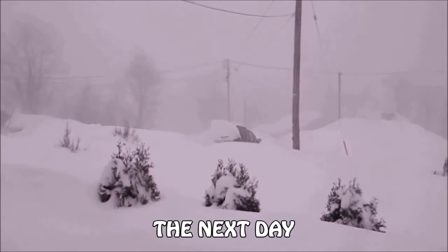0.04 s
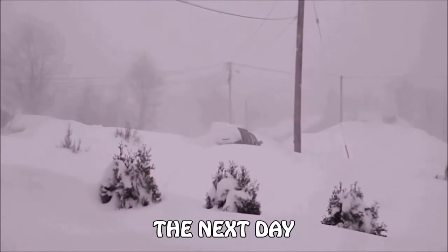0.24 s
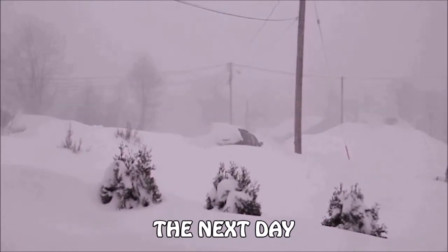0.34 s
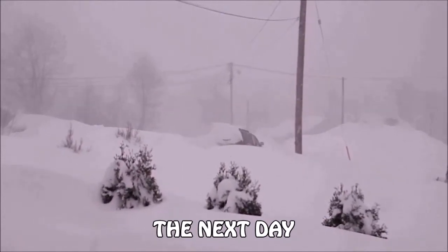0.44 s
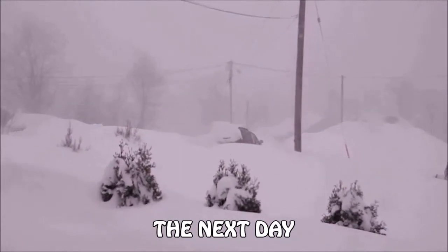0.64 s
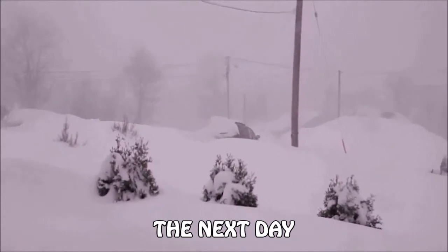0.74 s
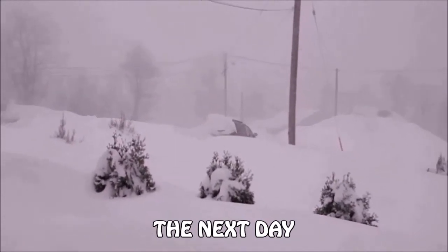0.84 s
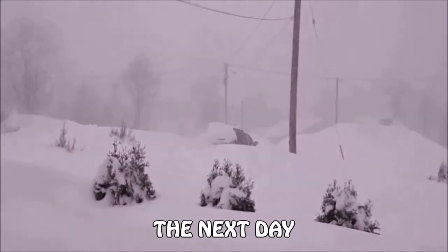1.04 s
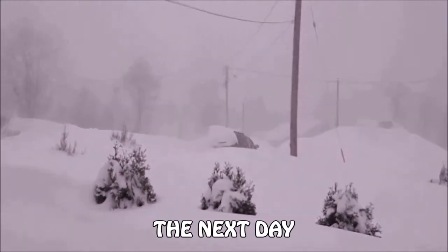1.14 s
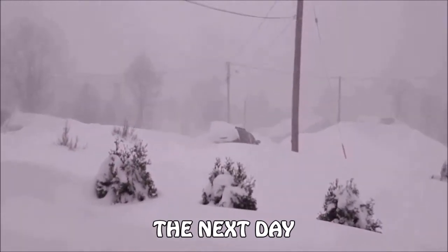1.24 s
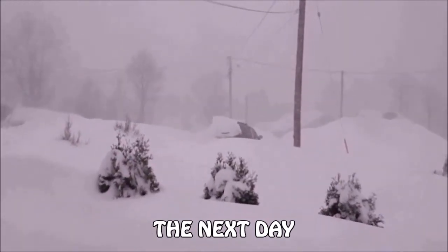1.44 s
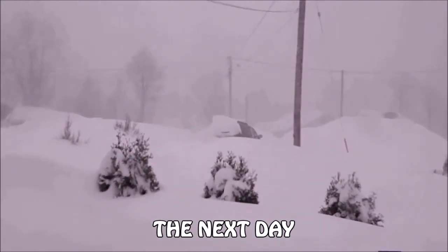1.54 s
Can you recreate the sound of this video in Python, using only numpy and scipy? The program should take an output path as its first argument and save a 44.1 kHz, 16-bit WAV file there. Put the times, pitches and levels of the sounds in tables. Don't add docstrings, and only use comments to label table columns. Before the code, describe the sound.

Blizzard wind buffets a small handheld microphone outdoors, close and dull: a soft start, booming shoves before half a second, the strongest cluster just before one second, one more punch, then a fading low rumble.

```python
import sys
import numpy as np
from scipy import signal
from scipy.fft import rfft, irfft
from scipy.io import wavfile
from scipy.ndimage import uniform_filter1d

SR = 44100
rng = np.random.default_rng(int(sys.argv[2]) if len(sys.argv) > 2 else 0)


def bounce(signal):
    frames = np.transpose(np.atleast_2d(signal))
    limited = np.clip(frames, -1, 1)
    pcm = np.round(limited * 32767).astype(np.int16)
    wavfile.write(sys.argv[1], SR, pcm)


def natural_amplitude(level_db):
    exponent = np.asarray(level_db, float) / 20
    return 10 ** exponent


N = 68355


def table(rows, column):
    rows = np.array(rows, float)
    return np.interp(np.arange(N) / SR, rows[:, 0], rows[:, column])


def unit(x):
    return x / np.sqrt(np.mean(x ** 2))


def butter(order, hz, kind, x):
    return signal.sosfilt(signal.butter(order, hz, kind, fs=SR, output="sos"), x)


def walk(rate_hz):
    hold = int(SR / rate_hz)
    steps = np.repeat(rng.standard_normal(N // hold + 1), hold)
    smooth = uniform_filter1d(uniform_filter1d(steps, hold), hold)
    return unit(smooth[:N])


def random_phase(count):
    return 2 * np.pi * rng.random(count)


def shoves(s, db, hz, length_s, phase):
    out = np.zeros(N)
    around = np.arange(-4096, 4096)
    for at, peak, f, width, p in zip(s, natural_amplitude(db), hz, length_s, phase):
        i = int(at * SR) + around
        t = i / SR - at
        inside = (i >= 0) & (i < N)
        bell = np.exp(-4 * np.log(2) * (t / width) ** 2)
        swing = peak * bell * np.cos(2 * np.pi * f * t + p)
        out[i[inside]] += swing[inside]
    return out


# (frequency [Hz], level [dB per Hz])
FAR_COLOUR = [(150, 0.5), (500, -7.5), (1000, -11.5), (2000, -20), (4000, -29), (6500, -35), (11000, -32.5),
              (15000, -32.5)]


def far_wind():
    hz = np.fft.rfftfreq(N, 1 / SR) + 1
    colour_hz, colour_db = np.array(FAR_COLOUR, float).T
    colour = natural_amplitude(np.interp(np.log(hz), np.log(colour_hz), colour_db)) * (hz > 120)
    roar = unit(irfft(rfft(rng.standard_normal(N)) * colour, N))
    low = signal.sosfiltfilt(signal.butter(2, 2500, fs=SR, output="sos"), roar)
    waver_db = 0.54 * walk(2.94) + 1.0 * walk(36)
    return natural_amplitude(-48.5) * (roar - low + low * natural_amplitude(waver_db))


# (time [s], level [dB])
SNOW_TICKS = [
    (0.001, -46.5),
    (0.201, -56),
    (1.22, -51.5),
]


def snow_ticks():
    t = np.arange(N) / SR
    puffs = sum(natural_amplitude(db) * np.exp(-((t - s) / 0.0017) ** 2) for s, db in SNOW_TICKS)
    taps = puffs * rng.standard_normal(N)
    return np.diff(taps, prepend=0) / 2


def sway():
    centre_hz = 28.2
    band_hz = [centre_hz * 0.53, centre_hz * 1.3]
    return natural_amplitude(-38.5) * unit(butter(2, band_hz, "band", rng.standard_normal(N)))


# (time [s], slow pressure [dB], flutter [dB])
GUST = [(0.0, -40.5, -25.5), (0.146, -32, -69), (0.24, -23.5, -25.5), (0.284, -44, -38.5),
        (0.384, -32.5, -30), (0.404, -19, -18), (0.508, -20.5, -17.5), (0.544, -33.5, -26),
        (0.802, -21, -18), (0.828, -13.5, -8.5), (0.928, -40.5, -9.5), (0.962, -11, -14.5),
        (1.134, -33.5, -26.5), (1.178, -20.5, -16), (1.394, -43.5, -49.5), (1.472, -21.5, -22),
        (1.518, -37, -41), (1.55, -22, -33)]


def rumble():
    centre_hz, width_hz = 56, 51.5
    b, a = signal.iirpeak(centre_hz, centre_hz / width_hz, fs=SR)
    x = rng.standard_normal(N)
    for _ in range(2):
        x = signal.lfilter(b, a, x)
    x = butter(2, 130, "low", x)
    flicker_db = 0.5 * walk(15.65)
    return unit(x) * natural_amplitude(table(GUST, 1) - 2 + flicker_db)


def eddies():
    count, cycles = 420, 0.7
    place, phase = rng.random(count), random_phase(count)
    size, strength = rng.standard_normal((2, count))
    gust_db = table(GUST, 2)[(place * N).astype(int)]
    middle_hz = 130 + 4.5 * (gust_db + 21.5)
    hz = middle_hz * 2 ** (0.59 * np.clip(size, -2, 1.2))
    db = gust_db - 6.5 + 2 * strength
    return shoves(place * N / SR, db, hz, cycles / hz, phase)


# (time [s], peak [dB],
# swing [Hz], length [ms])
BUFFETS = [(0.407, -4.5, 171, 5.9), (0.442, -7.5, 123, 13), (0.477, -6, 160, 3.1), (0.505, -11.5, 144, 12),
           (0.538, -21, 167, 10.8), (0.589, -25.5, 145, 7.2), (0.614, -15.5, 154, 2.5),
           (0.646, -19, 138, 18), (0.669, -32.5, 191, 6.3), (0.686, -20.5, 125, 6.4),
           (0.738, -9.5, 174, 6.56), (0.76, -17.5, 153, 12), (0.803, -26.5, 133, 3.3), (0.833, -5, 162, 15),
           (0.856, -7, 198, 3.3), (0.876, -1, 177, 5.3), (0.901, -7.5, 172, 5.2), (0.929, -8.5, 225, 7),
           (0.954, -13, 205, 4), (0.985, -12, 268, 3.47), (1.022, -17, 170, 2.4), (1.046, -19, 197, 5.4),
           (1.068, -19, 135, 7.4), (1.162, -41, 128, 4.6), (1.18, -5.5, 200, 6.3), (1.21, -16, 142, 2.8),
           (1.236, -25.5, 172, 16), (1.255, -14, 151, 2.9), (1.277, -36, 105, 13),
           (0.058, -31.5, 67.5, 72), (0.236, -28, 79, 38), (0.329, -31.5, 89.3, 23.5), (0.393, -24, 130, 12),
          (.447, -9, 96.4, 28), (.47, -11, 92, 20.5), (1.194, -11.5, 238, 5.25), (1.42, -38, 195.3, 32),
          (.61, -19.5, 100.7, 33), (0.657, -22, 78, 21), (0.774, -15.5, 74.8, 34), (0.816, -15, 96, 28.4),
          (0.861, -8, 94.8, 34.5), (0.982, -10, 71.5, 18), (1.062, -27, 83.7, 39), (1.186, -20.5, 89.6, 48),
          (1.253, -16.5, 90.4, 39), (1.348, -21, 68, 12), (1.467, -33.5, 84, 40)]


def buffets():
    s, db, hz, ms = np.array(BUFFETS).T
    return natural_amplitude(-0.5) * shoves(s, db, hz, ms / 1000, random_phase(len(s)))


# (time [s], peak [dB], swing [Hz])
SNAPS = [(.478, -29.5, 476), (.615, -33, 446), (.739, -20, 370), (.834, -31, 554), (.878, -33, 864),
         (.93, -28, 692), (.955, -36, 620), (.986, -33.5, 670), (1.02, -36.5, 652), (1.178, -46, 545),
         (1.194, -32, 550), (1.253, -36, 540)]


def snaps():
    s, db, hz = np.array(SNAPS, float).T
    return shoves(s, db, hz, 1.42 / hz, random_phase(len(s)))


def scene():
    fade_s = 0.012
    left_s = (N - np.arange(N)) / SR
    end_fade = np.sin(np.pi / 2 * np.clip(left_s / fade_s, 0, 1))
    background = far_wind() + snow_ticks()
    close_wind = sway() + rumble() + eddies() + buffets() + snaps()
    return (background + close_wind * end_fade)[None]


# (centre [s], length [s], treble kept below [Hz], treble loss [dB])
DROPOUTS = [(0.269, .016, 2910, 9), (.293, 0.027, 1300, 16), (0.32, 0.023, 1190, 8.5),
            (0.351, .018, 3030, 10), (.572, 0.023, 2200, 8), (0.834, 0.016, 1300, 42),
            (.976, 0.015, 2100, 10), (1.164, 0.019, 2280, 15), (1.266, 0.026, 2130, 20),
            (1.283, 0.016, 2000, 38.5), (1.434, 0.024, 2330, 24)]


def treble_dropouts(x):
    t = np.arange(N) / SR
    size = 2048
    hz = np.fft.rfftfreq(size, 1 / SR)
    window = np.hanning(size)
    out = x
    for s, length, edge_hz, db in DROPOUTS:
        i = int(s * SR) - size // 2
        above = np.clip((hz - edge_hz) / 200, 0, 1)
        treble = irfft(rfft(out[..., i:i + size] * window) * above, size)
        fade = np.clip((length / 2 - np.abs(t[i:i + size] - s)) / 0.008 + 0.5, 0, 1)
        faint = treble / np.maximum(window, 0.1) * np.sin(np.pi / 2 * fade) ** 2
        out = out - np.pad(faint, [(0, 0), (i, N - i - size)]) * (1 - natural_amplitude(-db))
    return out


# (centre [s], frequency [Hz], peak [dB])
STREAKS = [(.275, 5500, -72), (.275, 2300, -69), (.293, 2930, -69), (.296, 2210, -65), (.297, 1640, -62),
           (.299, 1360, -63), (.318, 3540, -69), (.35, 2840, -64), (.572, 4030, -69.5),
           (0.836, 2830, -66.5), (.835, 1540, -56), (.978, 2040, -65), (1.278, 1063, -57),
           (1.275, 1375, -53), (1.28, 2370, -69), (1.281, 2750, -69), (1.433, 1507, -55),
           (1.434, 1806, -60), (1.432, 2190, -58), (1.435, 2630, -60.5), (1.434, 3100, -65.5),
           (1.432, 3470, -77), (1.432, 9100, -70.5)]


def streaks():
    s, hz, db = np.array(STREAKS, float).T
    return shoves(s, db, hz, np.full(len(s), 0.022), random_phase(len(s)))


def top_cut(x):
    return signal.sosfilt(signal.butter(12, 15700, fs=SR, output="sos"), x)


def record(dry):
    x = butter(1, 25, "high", np.tanh(dry))
    x = treble_dropouts(x) + streaks()
    mix = signal.sosfilt(signal.ellip(10, 0.2, 45, 15050, fs=SR, output="sos"), x)
    return top_cut(mix)


dry = scene()
out = record(dry)
bounce(out)
```